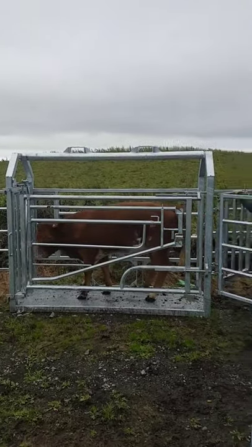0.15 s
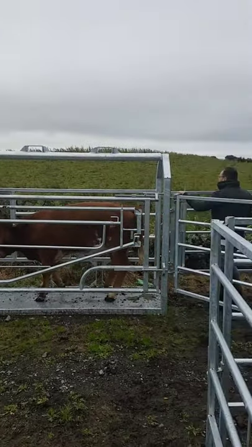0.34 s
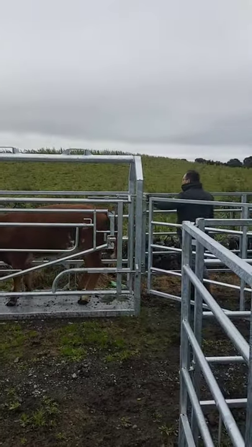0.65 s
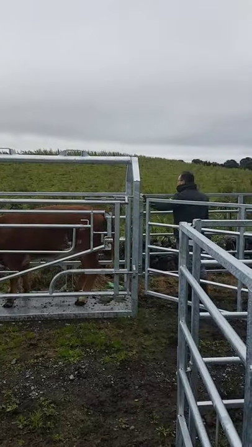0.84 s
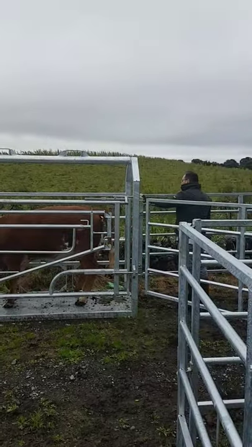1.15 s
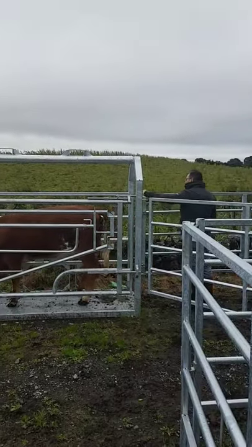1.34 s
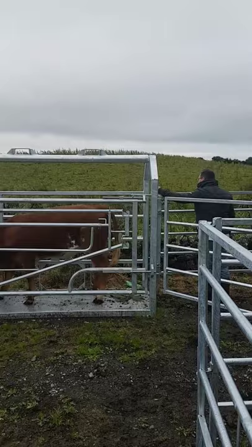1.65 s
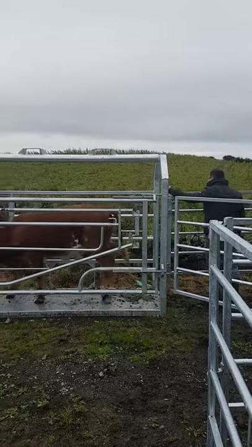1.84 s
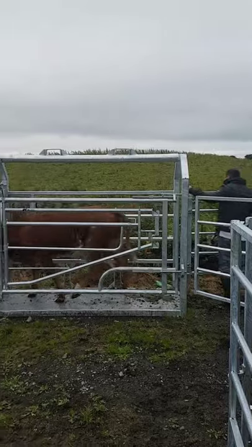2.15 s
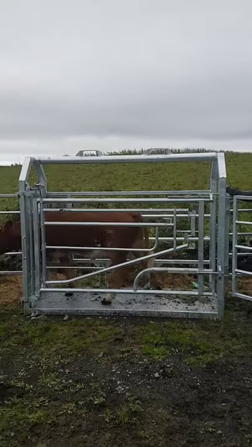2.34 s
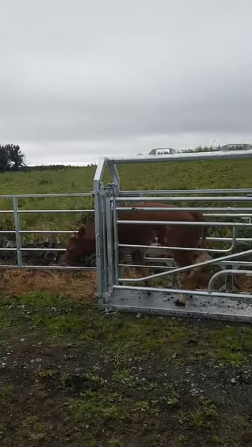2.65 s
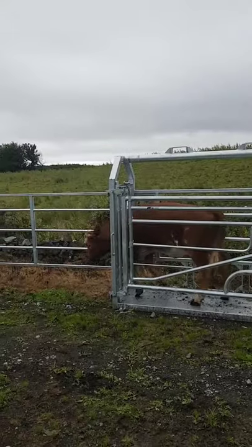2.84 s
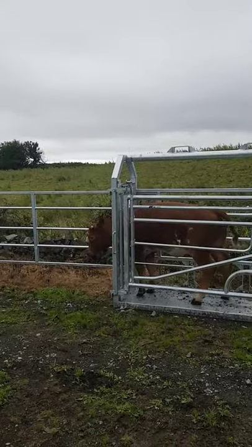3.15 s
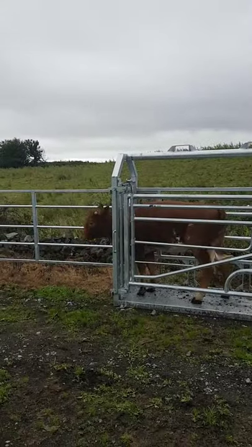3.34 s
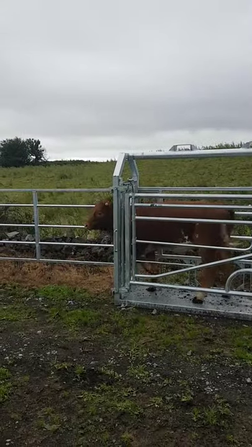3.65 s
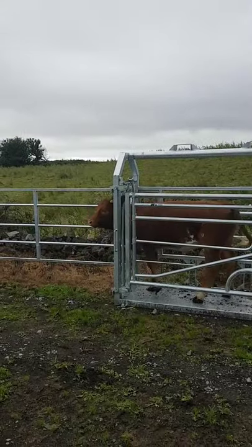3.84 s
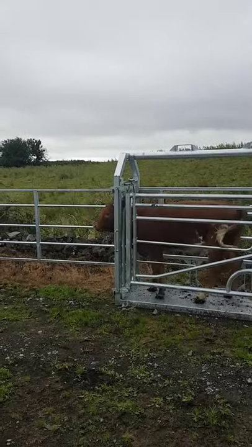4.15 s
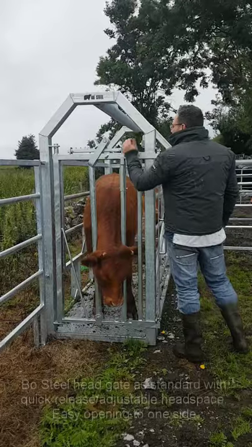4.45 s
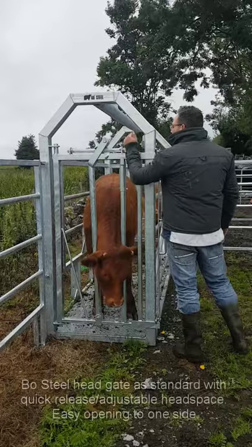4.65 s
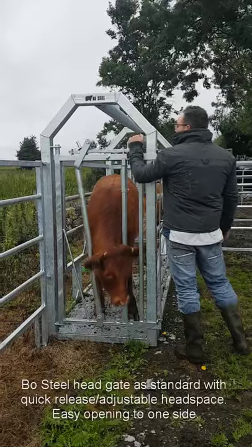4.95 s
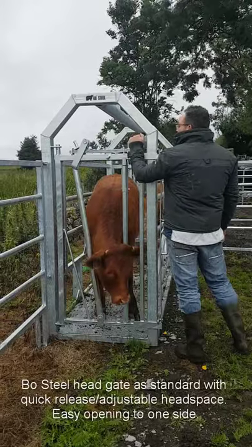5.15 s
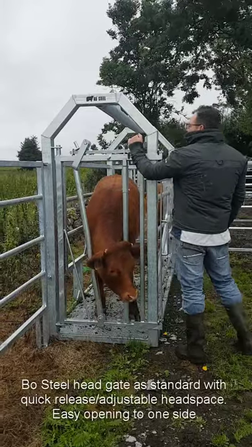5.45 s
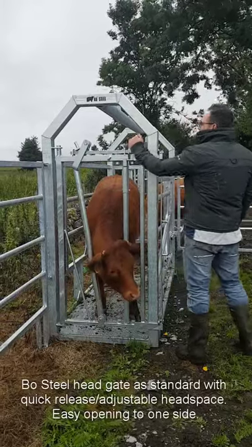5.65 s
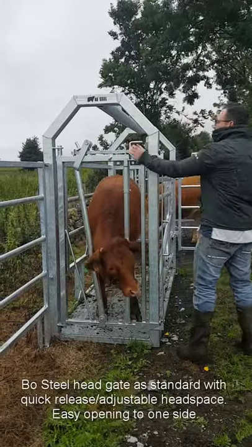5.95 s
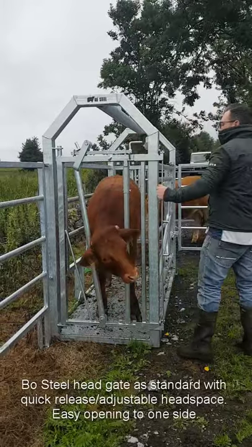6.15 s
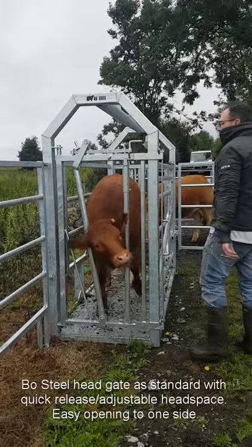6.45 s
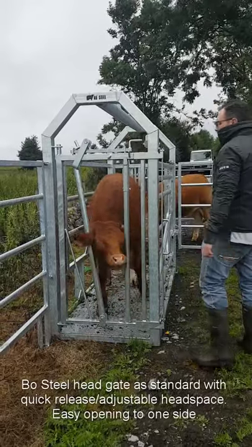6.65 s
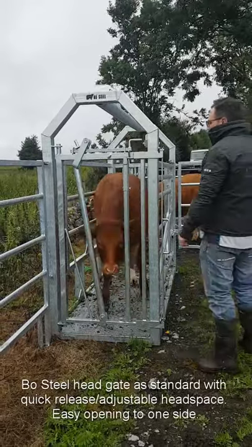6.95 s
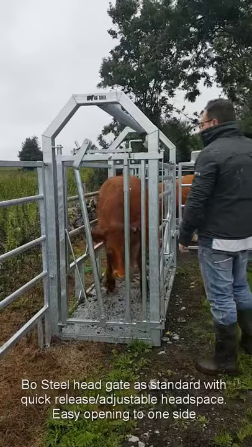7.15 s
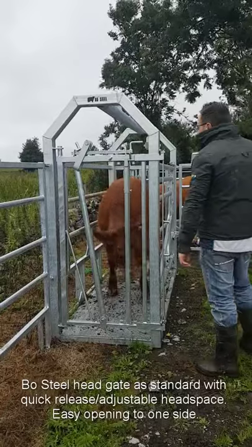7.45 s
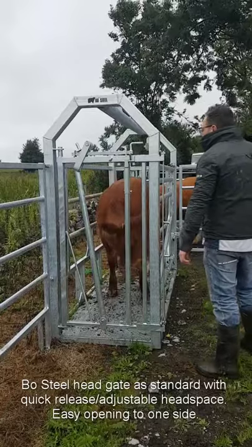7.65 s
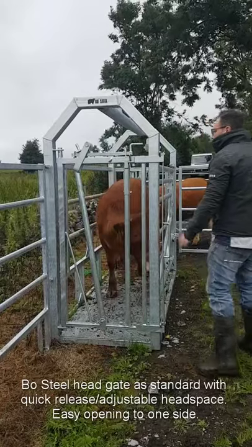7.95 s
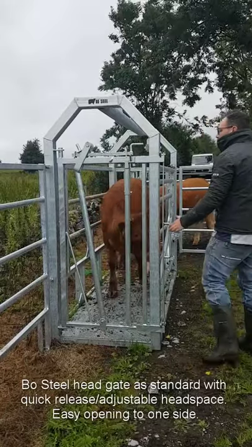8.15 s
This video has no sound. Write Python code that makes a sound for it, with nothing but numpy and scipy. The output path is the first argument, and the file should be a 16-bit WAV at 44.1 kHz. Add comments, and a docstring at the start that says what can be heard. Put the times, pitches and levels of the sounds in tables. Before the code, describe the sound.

Windy outdoor rumble, a loud galvanised gate slam, clattering bars and hooves, a squeaky head gate ratcheting, then quiet light metal taps.

```python
"""Cow in a steel cattle crush

A cow walks through a galvanised steel crush in an open field, a few metres from a hand-held phone.
Rear gate, frame, hooves and head gate are struck steel: dense noise-like partials and decaying modes;
loose joints add chains of random knocks. A latch taps its keeper, dry pivots squeal by stick-slip
as wavering harmonic tones, and small dry ticks of filtered noise sound close by.
Wind on the microphone ports and rustling grass and trees are shaped noise with varying level."""
import sys
import numpy as np
from scipy import signal
from scipy.fft import rfft, irfft
from scipy.io import wavfile
from scipy.ndimage import uniform_filter1d

SR = 44100
rng = np.random.default_rng(int(sys.argv[2]) if len(sys.argv) > 2 else 0)


def dump(signal):
    """Clip the signal to [-1, 1] and save it as 16-bit WAV at the path in sys.argv[1]."""
    limited = np.clip(np.atleast_2d(signal).T, -1, 1)
    pcm = np.round(limited * 32767).astype(np.int16)
    wavfile.write(sys.argv[1], SR, pcm)


N = 366456
TIME = np.arange(N) / SR
BLOW_SIZE = 32768  # samples in one blow's response

# All levels in the tables are relative: each source applies its own gain to them.

# Blows on each steel part: start_s, strength_db, weight_db (body over clang),
# hardness_db (treble over strength)
REAR_BLOWS = [(0.589, -44, 5.5, -25), (0.6513, -39.5, -14, -20.5), (0.7132, -24, -14.5, -29.5),
              (0.824, -14.5, -12, -8.5), (0.8492, -14, -9, -19.5), (0.9144, -18.5, -11, -17)]
FRAME_BLOWS = [(0.2465, -38, 5.5, -48), (1.738, -30.5, -8, -35), (1.8274, -38.5, -16, -7.5),
               (1.8606, -35.5, -9, -25), (2.034, -30, 5.5, -12), (2.074, -33, -10, -29),
               (2.2853, -37.5, 13.5, -13), (2.321, -34, 3.5, -19.5), (2.451, -26, -0.5, -13),
               (2.4841, -28, 0, -20), (2.5397, -33, -3, -26), (2.615, -23.5, 1, -19.5),
               (2.7047, -24, -7, -17), (2.736, -19, 0.5, -26), (2.782, -22.5, 2, -24),
               (2.805, -15.5, 2, -36), (2.8472, -15.5, 5, -15.5), (2.8742, -24, -4, -21),
               (3.0645, -26, -2, -12.5), (3.0977, -23, 1.5, -23), (3.1976, -31.5, -7.5, -26),
               (3.695, -38, -9.5, -22.5), (3.9991, -38.5, 2, -21), (4.133, -59, 15, 6),
               (5.9278, -43.5, 10.5, -26), (6.2717, -42, 0, -11.5), (6.329, -51, 21, -15),
               (6.357, -49.5, 1, -5), (6.6778, -45, -10, -5.5), (6.763, -37, 6.5, -31),
               (6.8735, -48.5, 4, -4.5), (7.1769, -38.5, -0.5, -19.5), (7.2072, -48, 0, -36),
               (8.182, -55, -2, -20), (8.2236, -35, -4.5, -24), (8.2942, -39, 6, -24)]
HEAD_BLOWS = [(4.6417, -39, -4, -16), (4.6673, -28, -8.5, -12.5), (4.7007, -22.5, -5.5, -13.5),
              (4.7891, -25, 0.5, -15), (4.8263, -26.5, -9, -16), (4.8663, -28, -16, -10.5),
              (4.9681, -35.5, 4.5, 6), (5.0397, -37, -5, -11), (5.071, -29, -5, -18),
              (5.1087, -31.5, -14, -19), (5.1566, -35, -2, -6.5), (5.3348, -32, -7, -22)]
# Hooves on the floor plate: start_s, level_db, grit_db (treble over that level)
HOOF_STEPS = [(2.074, -37, -25), (4.003, -48, -18), (6.721, -40, -22), (6.765, -35.5, -21),
              (6.799, -45, -10), (7.069, -43.5, -4.5), (7.092, -44, -16), (7.208, -41.5, -28),
              (7.312, -45, -29), (7.415, -45.5, -33), (8.178, -44, -20), (8.227, -48, -20)]
# Lasting modes of each part: frequency_hz, level_db, t60_s
REAR_MODES = [(741, -3.5, .4), (1002, -30, 2), (1119, -15, .4), (1302, -9, .35), (1583, -22, 1.6),
              (1770, -24, .9), (1815, -25, 1.5), (2110, -25, .6), (2338, -14, .4), (2907, -29, .9),
              (3018, -32, 1.1), (3639, -21, .65), (3759, -25, .7), (4845, -25, .7)]
FRAME_MODES = [(394, -25, 0.79), (727, -8.5, 0.18), (869, -14, 0.22), (937, -17, 0.16), (970, -26, 0.54),
               (996, -24, 0.75), (1215, -27.5, 1), (1240, -18.5, 0.87), (1282, -32, 0.91), (1693, -7, 0.15),
               (2050, -36.5, 1), (2270, -40, .5), (2380, -43, 0.7), (2540, -25, 0.34), (2570, -26, 0.74),
               (2840, -20, 0.35), (3520, -25, 0.44), (4110, -42, 0.52)]
BAR_MODES = [(1002, -17, 1.5), (1583, -15, 1.4), (1700, -9, .9), (1735, -9, 1), (1760, -5.5, 1.2),
             (1790, -7, 1.1), (1824, -7, 1.4), (1858, -8.5, 1.1), (1897, -11, 1.1), (2620, -13, 1),
             (2940, -14, 1.1), (3215, -15, .8), (3520, -14, .8), (4090, -16, .7)]
FLOOR_MODES = [(118, 6.5, 0.1), (184, -9, 0.24), (228, 4, 0.11), (453, -11, 0.14), (507, 2, 0.19),
               (641, 7, 0.16)]
HEAD_MODES = [(523, -11, 0.25), (740, -20, 1.1), (957, -26, 0.43), (1202, -19, 0.76), (1228, -28, 2.4),
              (1359, -12, 0.18), (1660, -25, 0.96), (1920, -10.5, 0.19), (2780, -21, 0.43),
              (3860, -12.5, 0.15)]
RATCHET_MODES = [(5290, -6, 0.27), (5750, -3, 0.27), (6180, -3, 0.2), (9250, -13, .12), (11200, -15, .14),
                 (12450, -10, .15), (13400, 2, 0.21), (14100, -5, .25), (14800, -4, .2)]
LATCH_MODES = [(2580, -10.5, 0.093), (2840, -11, 0.27), (2794, -16, 0.14), (2920, -14, 0.28),
               (2960, -6, 0.074)]
# Spectrum of each part's dense partials: frequency_hz, level_db
REAR_COLOUR = [(60, -34.5), (120, -42.5), (380, -4.5), (540, -19.5), (760, 2.5), (1400, -6.5), (1800, -3),
               (2600, -6.5), (3400, -18), (5000, -23), (7000, -35), (10000, -36.5), (13000, -35),
               (15500, -54.5)]
FRAME_COLOUR = [(45, -40.5), (120, -9.5), (390, -12), (520, -15), (800, -8.5), (1400, -11), (1750, -9.5),
                (2600, -6.5), (3300, -14.5), (4100, -17.5), (7200, -31), (10000, -37), (13000, -33.5),
                (15500, -43.5)]
HEAD_COLOUR = [(60, -40), (120, -7.5), (400, -7.5), (700, 2.5), (1400, 0), (2200, -5.5), (2850, -2.5),
               (3200, -10.5), (5800, -22.5), (7000, -32.5), (10000, -37.5), (13500, -38), (15500, -55)]
# How hard each part is shaken, so that its loose joints chatter: time_s, level_db
REAR_RATTLE = [(0.68, -64.5), (0.712, -30.5), (0.848, -26), (1.06, -55)]
FRAME_RATTLE = [(2.43, -52), (2.46, -31), (2.68, -33.5), (2.86, -19.5), (2.93, -29), (3.11, -28),
                (3.19, -41), (3.33, -42.5), (3.55, -58.5)]
HEAD_RATTLE = [(4.64, -52), (4.71, -26.5), (5.11, -31.5), (5.32, -51)]
# Ratchet teeth catching: start_s, level_db
RATCHET_CATCHES = [(4.702, -64), (4.864, -62), (4.969, -42.5), (5.040, -45), (5.157, -65)]
# Latch taps: start_s, level_db
LATCH_TAPS = [(3.5063, -37.5), (6.9745, -36), (7.3712, -34.5), (7.5395, -45.5), (7.7233, -45), (7.854, -55)]
# Dry pivots squealing, and two short high pings near 4.1 kHz made the same way: start_s, length_s, pitch_hz,
# level_db, octave_db (second harmonic over first)
SQUEALS = [(.715, .08, 1310, -38, -9), (2.32, .055, 1320, -41, -14), (2.615, .04, 4150, -38, -25),
           (2.735, .075, 770, -27, -18), (3.005, .095, 742, -33, -18), (3.21, .145, 1250, -45, -20),
           (3.694, .05, 4090, -47, -25), (4.695, .115, 1420, -28.5, -3)]
# Small dry ticks close by: start_s, treble_db, middle_db
TICKS = [(0.3462, -38.5, -42), (0.4874, -50, -41), (1.1228, -37.5, -34.5), (1.449, -63, -42.5),
         (1.524, -38.5, -34.5), (2.0132, -39, -33), (2.4463, -38, -42), (2.594, -33, -46),
         (3.505, -37, -51), (4.8254, -56, -32), (4.84, -40, -23), (7.8043, -50, -60.5)]
# Strength of the steady wind on the ports: time_s, level_db
WIND_LEVEL = [(0.0, -39.5), (0.38, -50), (0.46, -42), (0.56, -37), (0.75, -31.5), (1.2, -37.5), (1.32, -45),
              (2.1, -34), (2.23, -43.5), (2.82, -36), (3.5, -52), (4.4, -44.5), (4.56, -35), (4.95, -42.5),
              (6.3, -41.5), (7.35, -57.5), (7.55, -62), (8.31, -68)]
# Single gusts: start_s, hold_s, level_db
GUSTS = [(0.009, 0.2, -33.5), (0.262, 0.13, -30.5), (0.494, 0.066, -34), (0.63, 0.014, -24),
         (2.047, 0.08, -33), (2.63, .07, -34.5), (3.12, 0.14, -45), (3.33, 0.02, -40.5),
         (3.994, 0.046, -39), (5.504, 0.1, -37.5), (7.18, 0.024, -42), (8.193, 0.031, -48)]
# Which port faces the wind: time_s, left_minus_right_db
WIND_SIDE = [(0.0, 3.5), (0.5, 4), (3.45, 6.5), (4.2, -2.5), (5.21, 3.5), (6.1, -6.5), (8.31, -0.5)]
# Spectrum of the wind: frequency_hz, level_db
WIND_COLOUR = [(25, -22), (50, -8), (100, -1), (180, -4), (350, -7), (550, -16), (900, -30), (2000, -50.5)]
# Strength of the breeze in grass and trees: time_s, level_db
BREEZE_LEVEL = [(0.0, -61.5), (1.2, -61), (2.9, -55.5), (3.5, -63), (4.3, -62.5), (4.5, -66.5), (8.31, -65)]
# Spectrum of the rustling field: frequency_hz, level_db
FIELD_COLOUR = [(30, -2), (85, 6.5), (300, -1), (560, -4.5), (950, -6.5), (1900, -14), (2750, -17),
                (4300, -27), (7000, -30.5), (10000, -32), (13000, -28.5), (15500, -32.5)]
# Thud, body, clang and treble registers of a blow: low_hz, high_hz
BAND_EDGES = [(150, 550), (550, 1400), (1400, 4000), (5000, 15000)]
# A brief dip in level: start_s, end_s
LEVEL_DIP = (4.371, 4.402)

BAND_CENTRES_HZ = np.sqrt(np.prod(BAND_EDGES, axis=1))


def rear_gate():
    """Damping: the gate chatters along its track, damped by the hand, then slams and rings freely."""
    slam = blows(registers(REAR_BLOWS, thud_db=-5.5), REAR_COLOUR, REAR_MODES,
                 clang_db=-6.0, dense_db=-4.5, ring_db=-0.5, crack=0.29,
                 t60=0.28, tail_db=-17.5, tail_t60=0.94)
    # the hand keeps the lasting modes low while the gate runs
    run = rattle(REAR_RATTLE, REAR_COLOUR, REAR_MODES, db=0, treble_db=-32, ring_db=-20,
                 rate=260, t60=0.046, scatter_db=4.5)
    return slam + run


def frame():
    """Impact excitation: flanks knock the frame, and its loose joints chatter as it shakes."""
    knocks = blows(registers(FRAME_BLOWS, thud_db=-10), FRAME_COLOUR, FRAME_MODES,
                   clang_db=-4.0, dense_db=-3.5, ring_db=-0.5, crack=0.15,
                   t60=0.29, tail_db=-10, tail_t60=0.67)
    loose = rattle(FRAME_RATTLE, FRAME_COLOUR, FRAME_MODES, db=-4.5, treble_db=-29, ring_db=-8.0,
                   rate=130, t60=0.13, scatter_db=3)
    return knocks + loose


def side_bars():
    """Coupled vibration: every blow on the frame sets the long side bars ringing."""
    bar_share = 0.68  # dB of ringing per dB of the blow's clang
    pushes = [(s, bar_share * (db - weight / 2)) for s, db, weight, _ in FRAME_BLOWS]
    return taps(pushes, BAR_MODES, db=-28.5)


def hooves():
    """Plate modes: hooves boom on the floor plate, scrape grit and shake the frame dully."""
    thud_db, body_db, clang_db = 6.5, -3, -10.5  # frame registers against the hoof's own level
    steps = [(s, db + thud_db, db + body_db, db + clang_db, db + grit) for s, db, grit in HOOF_STEPS]
    shake = blows(steps, FRAME_COLOUR, FRAME_MODES,
                  clang_db=-6.0, dense_db=-3.0, ring_db=-1.0, crack=0.56,
                  t60=0.29, tail_db=-12, tail_t60=0.8)
    boom = taps([(s, db) for s, db, _ in HOOF_STEPS], FLOOR_MODES, db=-2.0)
    return shake + boom


def head_gate():
    """Repeated impact: the lever drives the neck bars over their ratchet, whose teeth ring high."""
    clatter = blows(registers(HEAD_BLOWS, thud_db=-4), HEAD_COLOUR, HEAD_MODES,
                    clang_db=-6.5, dense_db=-5.0, ring_db=0.5, crack=1.0,
                    t60=0.29, tail_db=-10, tail_t60=0.77)
    loose = rattle(HEAD_RATTLE, HEAD_COLOUR, HEAD_MODES, db=-5.0, treble_db=-31, ring_db=-13,
                   rate=170, t60=0.2, scatter_db=3)
    return clatter + loose + taps(RATCHET_CATCHES, RATCHET_MODES, db=1)


def squeals(waver=.014, rough_db=3, rolloff_db=-9):
    """Stick-slip friction: a dry pivot sounds at a bar's pitch, with a few falling overtones; short high pings
    are made the same way."""
    out = np.zeros(N)
    wobble = 1 + waver * walk(220)
    grip = undb(rough_db * walk(110))
    for s, length, hz, db, octave_db in SQUEALS:
        t = np.arange(int(length * SR)) / SR
        first = int(s * SR)
        span = slice(first, first + len(t))
        phase = 2 * np.pi * np.cumsum(hz * wobble[span]) / SR
        tone = np.sin(phase)
        for k in (2, 3, 4):
            tone = tone + undb(octave_db + rolloff_db * (k - 2)) * np.sin(k * phase)
        swell = np.sqrt(np.sin(np.pi * t / length))
        add(out, s, undb(db) * grip[span] * swell * tone)
    return out


def latch(db=-2, knock_db=-11):
    """Light impact: a small hanging latch taps its keeper, with a knock of dense partials below."""
    out = taps(LATCH_TAPS, LATCH_MODES, db)
    for s, level in LATCH_TAPS:
        add(out, s, undb(level + knock_db) * steel(HEAD_COLOUR) * fade(0.29))
    return out


def ticks(t60=0.012):
    """Broadband transients: short bursts of bright and dull noise with a faint, slower tail."""
    out = np.zeros((2, N))
    hz = np.fft.rfftfreq(BLOW_SIZE, 1 / SR)
    bright = shape([(2500, -20), (5500, -2.0), (13000, 7), (16000, 9.0)], hz)
    dull = shape([(700, -10), (2400, 3), (4500, -18.5), (8000, -38.0)], hz)
    decay = fade(t60) + undb(-13.0) * fade(0.17)
    for s, treble_db, middle_db in TICKS:
        treble = undb(treble_db) * noise(bright, 0.13, BLOW_SIZE)
        middle = undb(middle_db) * noise(dull, 0.23, BLOW_SIZE)
        add(out, s - .001, (treble + middle) * decay)
    return out


def wind(flutter_db=2.5, burst_db=3.5, upper_db=-2):
    """Turbulence: independent eddies at each port give a slow rumble and puffs that reach higher."""
    hz = np.fft.rfftfreq(N, 1 / SR)
    gain = shape(WIND_COLOUR, hz) / np.sqrt(1 + (hz / 1500) ** 4)
    low = 1 / (1 + (hz / 140) ** 2)
    eddies = np.clip(np.array([walk(34), walk(34)]), -2, 2)
    rumble = unit(noise(gain * low, 0, N) * undb(flutter_db * eddies))
    puffs = unit(noise(gain * (1 - low), 0, N) * undb(burst_db * eddies))
    side_db = curve(WIND_SIDE) * np.array([[.5], [-.5]])
    return unit(rumble + undb(upper_db) * puffs) * wind_force() * undb(side_db)


def wind_force():
    """Addition of powers: the steady wind plus gusts that rise, hold and drop away."""
    attack_s, release_s = 0.0078, 0.013
    power = undb(curve(WIND_LEVEL)) ** 2
    for s, hold, db in GUSTS:
        corners = np.cumsum([0, attack_s, hold, release_s])
        gust = undb(db) * np.interp(TIME - s, corners, [0, 1, 1, 0])
        power = power + gust ** 2
    return np.sqrt(power)


def field(db=10, sway_db=-0.67):
    """Diffuse sound: grass and trees rustle far and near, less alike at the two ports in the treble."""
    hz = np.fft.rfftfreq(N, 1 / SR)
    gain = shape(FIELD_COLOUR, hz) * hz / np.hypot(hz, 250)
    rustle = noise(gain, 0.4 / (1 + (hz / 2500) ** 2), N)
    return rustle * undb(curve(BREEZE_LEVEL) + db + sway_db * walk(6.95))


def registers(table, thud_db):
    """Contact mechanics: weight moves a blow's energy down, a hard contact adds treble."""
    return [(s, db + weight / 2 + thud_db, db + weight / 2, db - weight / 2, db + hardness)
            for s, db, weight, hardness in table]


def blows(table, colour, modes, clang_db, dense_db, ring_db, crack, t60, tail_db, tail_t60):
    """Steel on steel: short partials that bounce as they die, an added tail, a few lasting modes."""
    out = np.zeros((2, N))
    waves, ports = ring(modes)
    mode_hz = np.array(modes)[:, 0]
    rise = 1 - fade(.016)
    for s, thud, body, clang, treble in table:
        bands = np.array([thud - 2, body, clang + clang_db, treble])
        # about 70 random bounces a second after the first crack, each dying over 4.7 ms
        bounces = (rng.random(BLOW_SIZE) < 70 / SR) * rng.random(BLOW_SIZE)
        bounces[0] = crack
        contact = 1 + signal.lfilter([1], [1, -np.exp(-1 / (0.0047 * SR))], bounces)
        crowd = steel(colour, bands, uneven_db=7) * contact * fade(t60)
        tail = steel(colour, bands, uneven_db=11) * undb(tail_db) * fade(tail_t60)
        add(out, s - .002, undb(dense_db) * rise * (crowd + tail))
        gains = push(modes, s) * shape(np.c_[BAND_CENTRES_HZ, bands], mode_hz)
        add(out, s, undb(ring_db) * strike(waves, ports, gains))
    return out


def rattle(table, colour, modes, db, treble_db, ring_db, rate, t60, scatter_db):
    """Random impulse train: loose pins and bars knock at three places, each knock ringing the tubes."""
    inside = (TIME > table[0][0]) & (TIME < table[-1][0])
    sizes = undb(scatter_db * np.clip(rng.standard_normal(N), -2, 2))
    knocks = unit((rng.random(N) < rate / SR) * sizes) * inside
    place = rng.integers(0, 3, N)
    split = signal.butter(4, 4500, "high", fs=SR, output="sos")
    shaking_db = curve(table)
    waves, ports = ring(modes, size=BLOW_SIZE)
    out = 0
    for k in range(3):
        tube = steel(colour, uneven_db=9) * fade(t60)
        tones = strike(waves, ports, push(modes, rng.random()))
        treble = signal.sosfilt(split, tube)
        for response, layer_db in ((tube, db), (tones, ring_db), (treble, treble_db)):
            force = knocks * (place == k) * undb(shaking_db + layer_db)
            response = unit(response) / np.sqrt(BLOW_SIZE)
            out = out + signal.oaconvolve(force[None], response, axes=1)[:, :N]
    return out


def taps(table, modes, db):
    """Modal excitation: light blows ring one part."""
    out = np.zeros((2, N))
    waves, ports = ring(modes)
    for s, level in table:
        add(out, s, undb(level + db) * strike(waves, ports, push(modes, s)))
    return out


def steel(colour, band_db=None, uneven_db=5, spread_hz=2400):
    """High modal density: welded tube's crowded partials, each register set by the blow's bands."""
    hz = np.fft.rfftfreq(BLOW_SIZE, 1 / SR)
    gain = shape(colour, hz)
    size = 1
    if band_db is not None:
        energy = np.sum(gain ** 2)
        share = [np.sum(gain[(hz > lo) & (hz < hi)] ** 2) / energy for lo, hi in BAND_EDGES]
        weight = shape(np.c_[BAND_CENTRES_HZ, band_db - 10 * np.log10(share)], hz)
        gain = gain * weight
        size = np.sqrt(np.sum(gain ** 2) / energy)
    # single partials stand out, while every few hundred Hz hold the same energy
    grid = np.linspace(0, SR / 2, num=1500)
    partials = undb(uneven_db * np.interp(hz, grid, rng.standard_normal(len(grid))))
    partials = partials / np.sqrt(uniform_filter1d(partials ** 2, size=400))
    return size * noise(gain * partials, 0.94 / (1 + (hz / spread_hz) ** 2), BLOW_SIZE)


def ring(modes, size=65536, spread=1.0):
    """Normal modes: decaying complex sines that reach the two ports a little out of phase."""
    t = np.arange(size) / SR
    waves = np.array([undb(db) * fade(t60, size) * np.exp(2j * np.pi * hz * t) for hz, db, t60 in modes])
    ports = np.exp(1j * spread * rng.standard_normal((2, len(modes))))
    return waves.astype(np.complex64), ports


def strike(waves, ports, gains):
    """Superposition: sound a set of modes once, each with its own size and phase."""
    return ((ports * gains).astype(np.complex64) @ waves).imag


def push(modes, s, scatter=0.65):
    """Phase coherence: a blow at time s roughly goes with the swing already there."""
    swing = 2 * np.pi * np.array(modes)[:, 0] * s
    return np.exp(1j * (swing + scatter * rng.standard_normal(len(modes))))


def fade(t60, size=BLOW_SIZE):
    """Exponential decay: the level falls 60 dB in t60 seconds, 2 ms at the least."""
    return 1000. ** (-np.arange(size) / SR / max(t60, .002))


def noise(gain, likeness, size):
    """Interchannel coherence: stereo noise of rms 1 with a given spectrum and left-right likeness."""
    mid, side = rfft(rng.standard_normal((2, size))) * gain
    c = np.clip(likeness, 0, 1)
    return unit(irfft(mid * np.sqrt(1 + c) + side * np.sqrt(1 - c) * np.array([[1], [-1]]), size))


def walk(rate):
    """Band-limited chance: random steps at rate per second, smoothed twice and scaled to rms 1."""
    k = max(int(SR / rate), 1)
    steps = np.repeat(rng.standard_normal(N // k + 1), k)
    return unit(uniform_filter1d(uniform_filter1d(steps, k), k)[:N])


def shape(points, hz):
    """Spectral envelope: gain at the given frequencies, with dB linear in log frequency."""
    f, db = np.transpose(points)
    return undb(np.interp(np.log(hz + 1), np.log(f), db))


def curve(rows):
    """Linear interpolation: a control curve at every sample."""
    rows = np.array(rows)
    return np.interp(TIME, rows[:, 0], rows[:, 1])


def undb(db):
    """Logarithmic level: decibels to amplitude gain."""
    return 10 ** (np.asarray(db) / 20)


def unit(x):
    """Root mean square: scale to rms 1."""
    return x / np.sqrt(np.mean(x ** 2))


def add(out, s, x):
    """Superposition: mix a sound in at time s."""
    i = int(s * SR)
    out[..., i:i + x.shape[-1]] += x[..., :N - i]


def to_right(x, count):
    """Arrival-time difference: a source on the right reaches the left port count samples late."""
    return np.array([np.roll(x[0], count), x[1]])


def scene():
    """Superposition: steelwork slightly to the right, with close ticks, wind and open field."""
    body = to_right(frame() + side_bars() + hooves() + latch(), count=3)
    head = to_right(head_gate() + squeals(), count=5)
    crush = rear_gate() + body + head
    pan_db = np.array([[-0.52], [0.52]])  # left, right
    return crush * undb(pan_db) + ticks() + wind() + field()


def record(dry):
    """Band limiting: the level dips briefly once; the phone drops the deepest bass and the top."""
    inside = (TIME > LEVEL_DIP[0]) & (TIME < LEVEL_DIP[1])
    dip = uniform_filter1d(1. * inside, size=128)
    bass_cut = signal.butter(2, 25, "high", fs=SR, output="sos")
    top_cut = signal.ellip(10, .2, 80, 15600, fs=SR, output="sos")
    wet = signal.sosfilt(bass_cut, dry * undb(-19 * dip))
    return signal.sosfilt(top_cut, wet)


dry = scene()
out = record(dry)
dump(out)
```